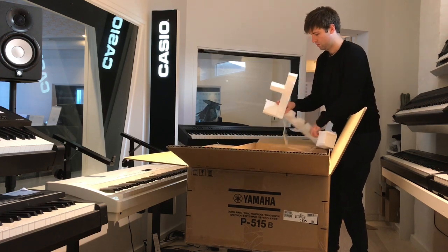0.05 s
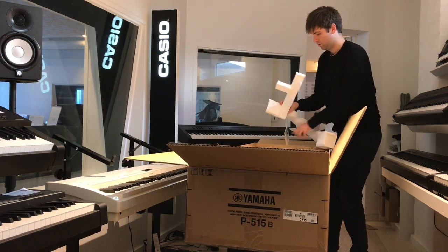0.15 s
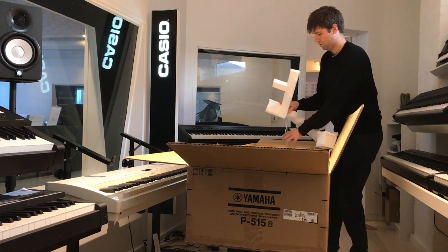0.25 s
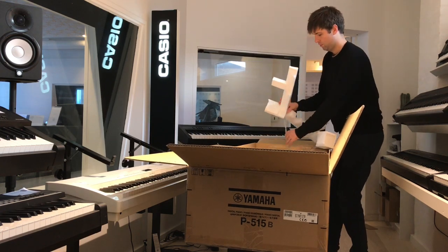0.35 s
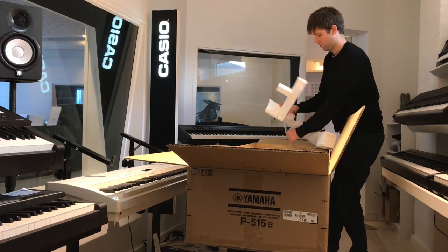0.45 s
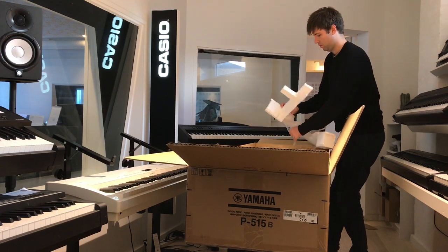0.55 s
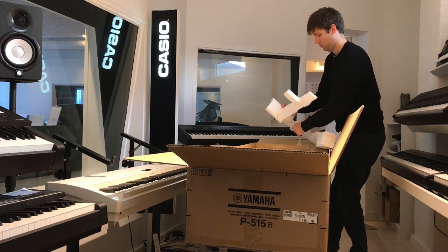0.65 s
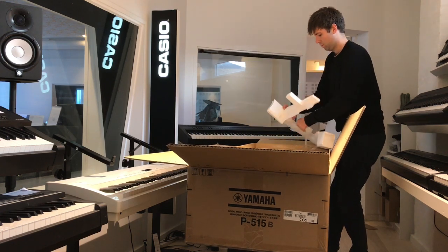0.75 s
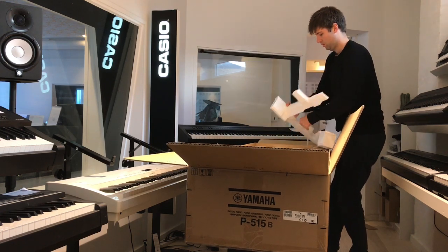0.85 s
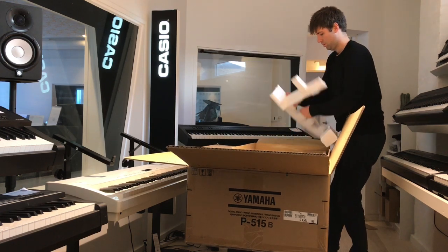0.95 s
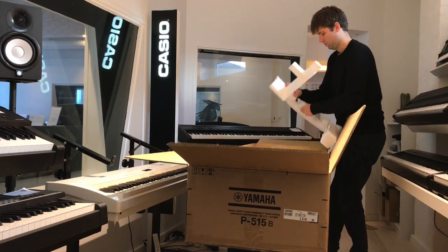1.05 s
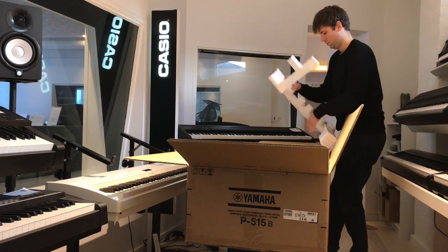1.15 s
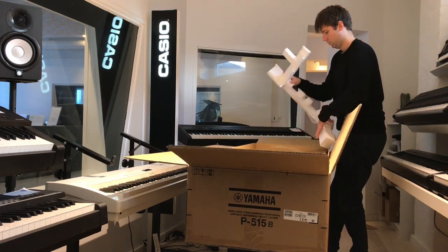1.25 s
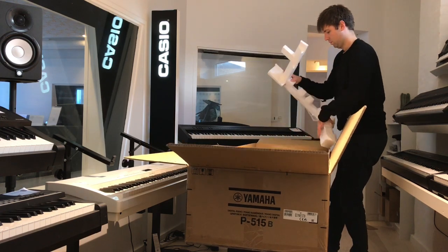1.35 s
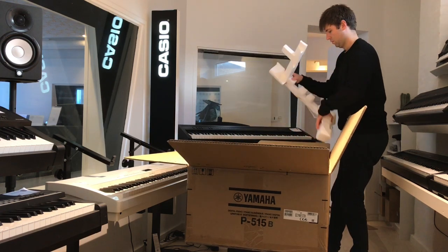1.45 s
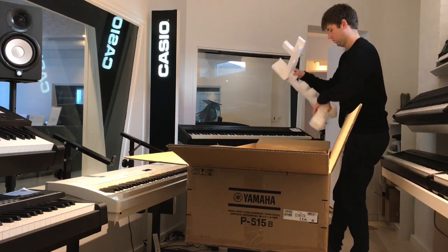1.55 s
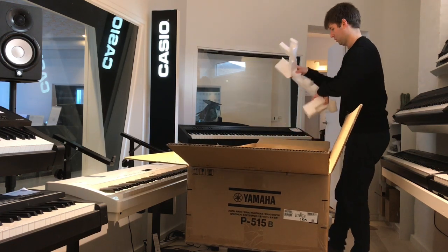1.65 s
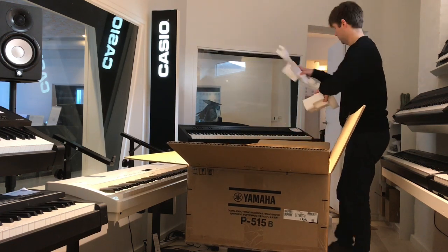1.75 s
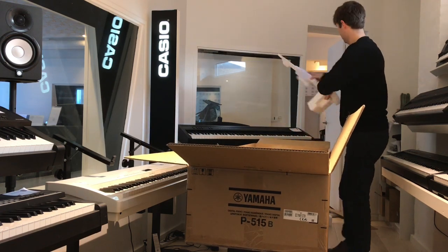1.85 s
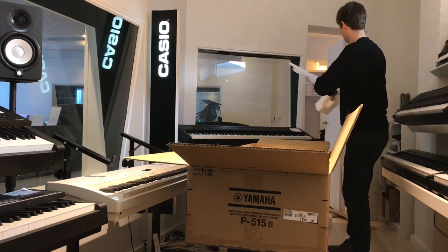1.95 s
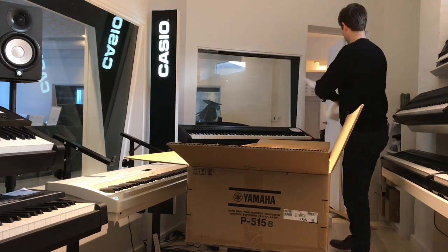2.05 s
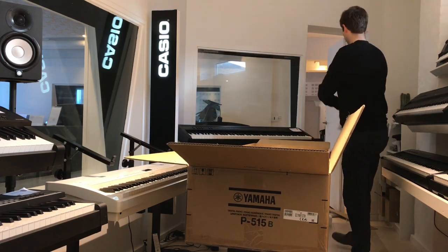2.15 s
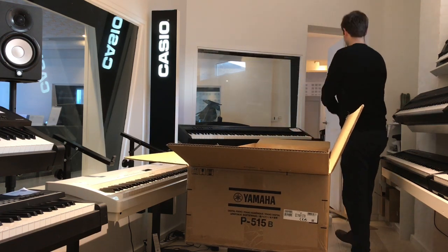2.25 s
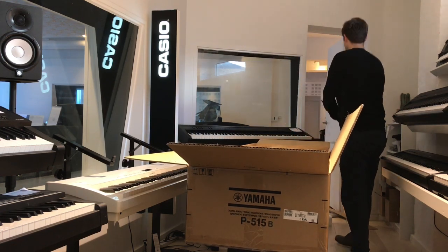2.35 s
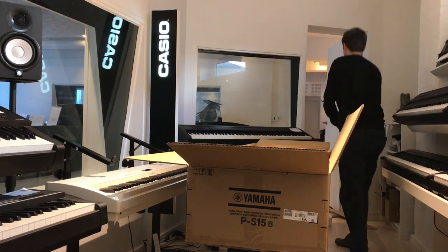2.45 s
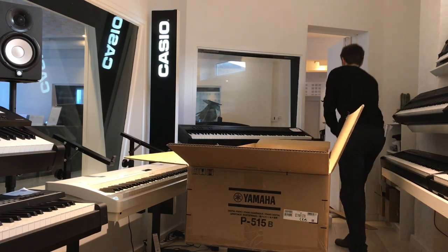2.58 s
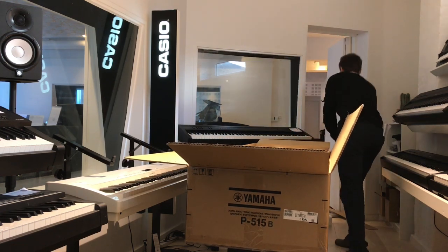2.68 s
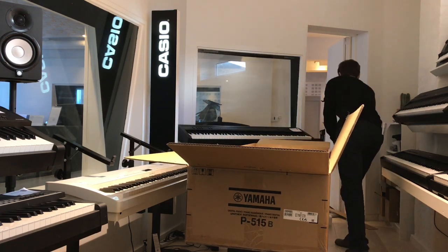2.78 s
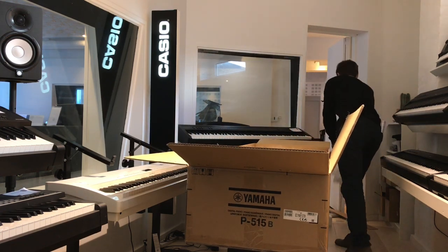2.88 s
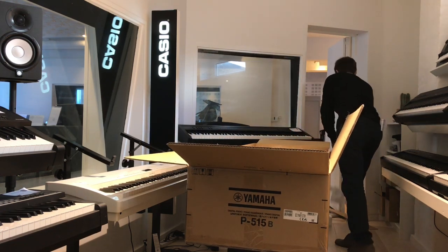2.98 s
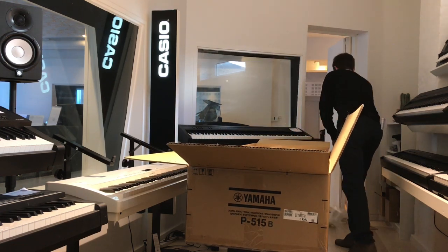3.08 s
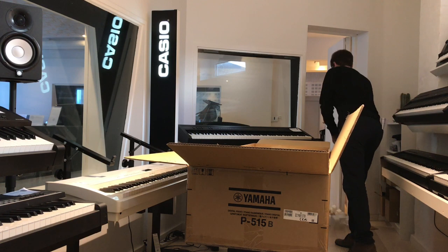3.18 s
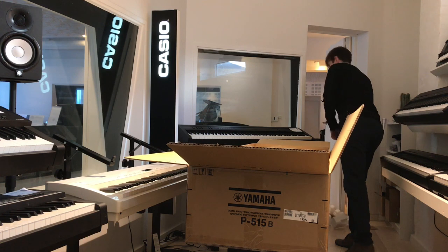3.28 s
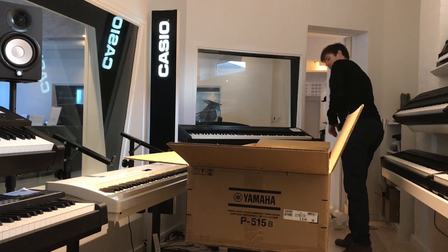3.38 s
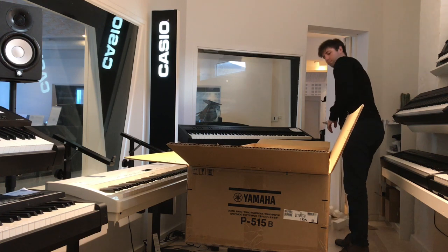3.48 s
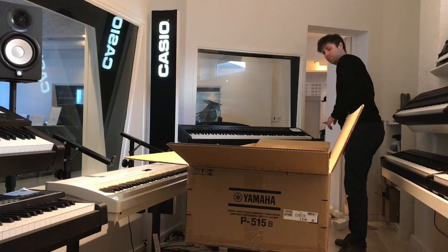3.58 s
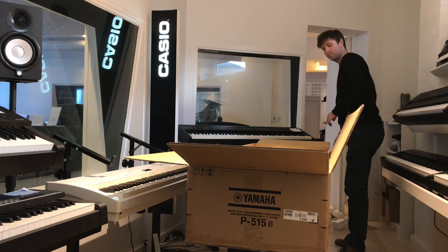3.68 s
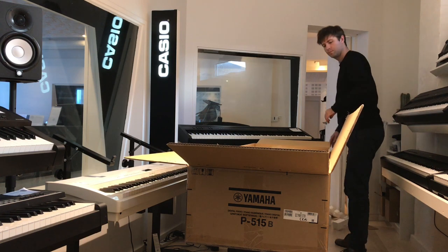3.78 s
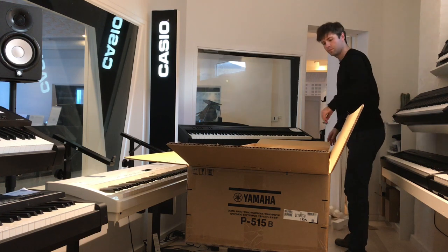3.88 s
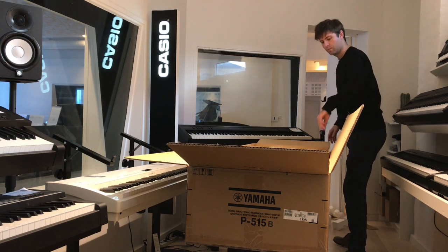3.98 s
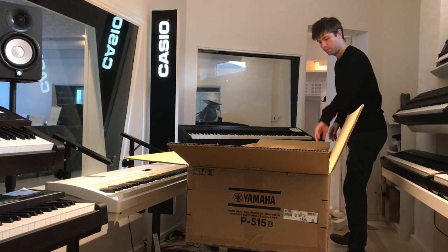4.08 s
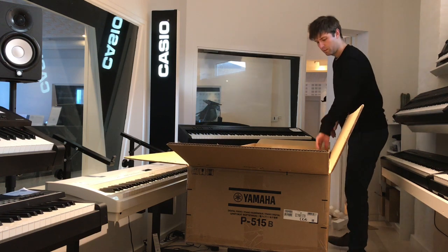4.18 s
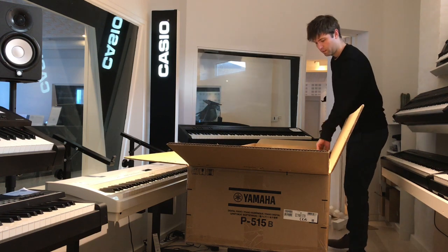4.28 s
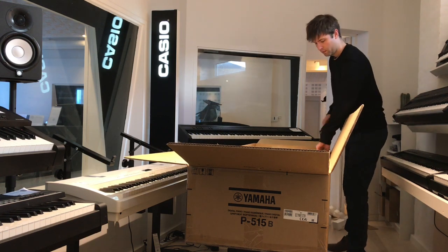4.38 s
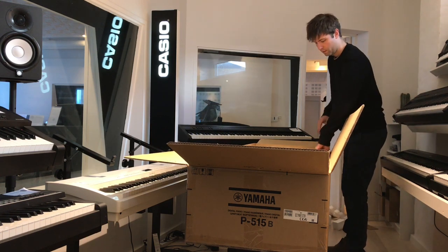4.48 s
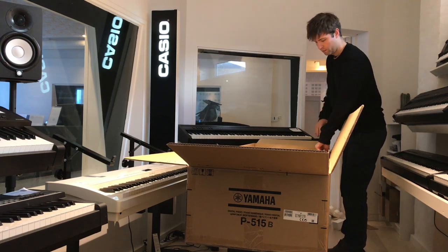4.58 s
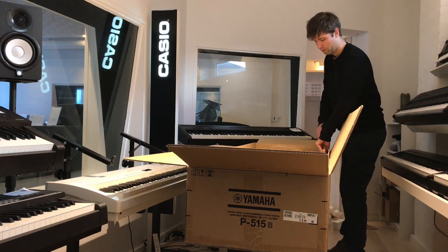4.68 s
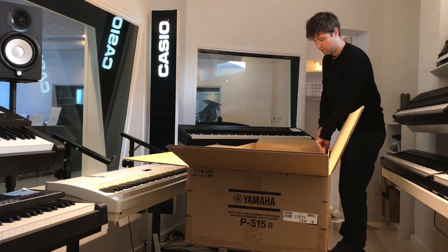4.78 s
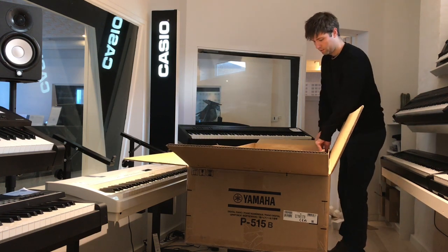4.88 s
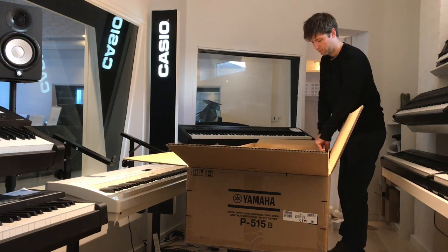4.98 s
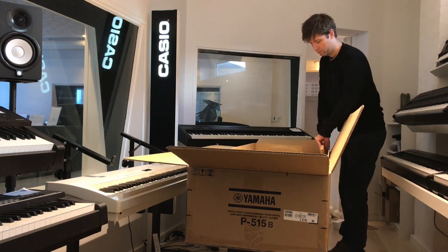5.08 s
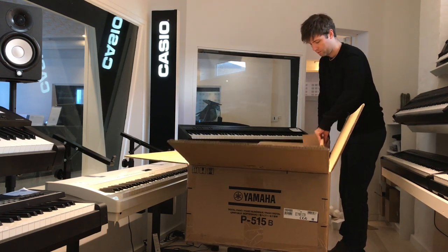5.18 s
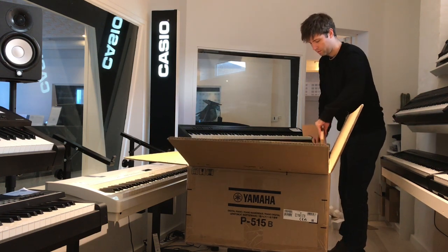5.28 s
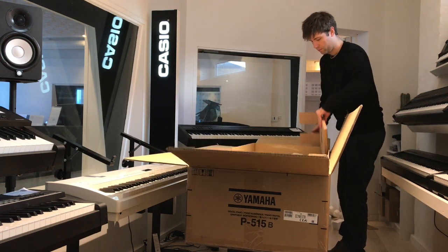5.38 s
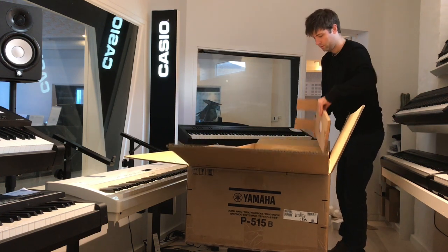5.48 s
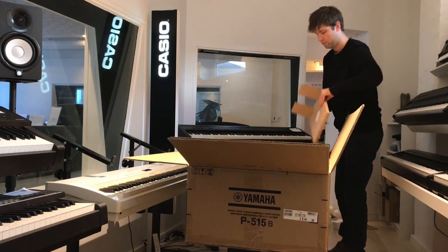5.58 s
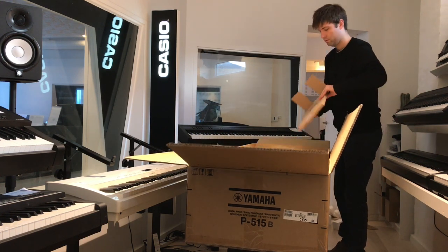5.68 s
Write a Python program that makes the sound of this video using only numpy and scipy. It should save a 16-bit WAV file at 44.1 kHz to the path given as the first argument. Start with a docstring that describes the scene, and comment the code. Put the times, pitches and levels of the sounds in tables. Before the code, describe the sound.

In a small, lightly reverberant room, a polystyrene block is dragged from a big cardboard box in rough, juddering pulls with snaps, short squeaks and hollow booms. It rustles as it is carried off, with a soft step, then lands hard and topples on the floor. After more footfalls, hands slide quietly over cardboard and knock the box. One room microphone, same in both channels.

```python
"""A small live room: a polystyrene block is dragged out of a big cardboard box, carried off rustling
and dropped on the floor, among footfalls; then hands rummage in the box and knock an insert loose.
Scraping is noise made of dense tiny slips; blows add short bursts of slips to ringing panels, block or floor.
Squeals are slips through a narrow resonance. Echoes are noise that follows the energy of the slips.
Quiet room air lies under it all, and one microphone colours the sum, the same in both channels."""
import sys
import numpy as np
from scipy import signal
from scipy.fft import rfft, irfft
from scipy.io import wavfile

SR = 44100
rng = np.random.default_rng(int(sys.argv[2]) if len(sys.argv) > 2 else 0)


def inscribe(sig):
    """Save sig as 16-bit PCM at rate SR to the path in sys.argv[1].

    A 1-D sig is mono; a 2-D sig holds one channel per row.
    Samples are clipped to [-1, 1] before scaling.
    """
    pcm = np.round(np.clip(np.atleast_2d(sig).T, -1, 1) * 32767)
    wavfile.write(sys.argv[1], SR, pcm.astype(np.int16))


N = 253134
TIME = np.arange(N) / SR

# ways the box panels vibrate: [f/Hz, level/dB, time to fade by 60 dB/s]
BOX_MODES = [(69.3, 9, 0.31), (121.9, -4, 1), (135.4, 6, 0.58), (182.9, 1.5, 0.55), (221, -5.5, 0.56),
             (246.2, -3, 0.75), (314, -6.5, 0.19), (364.6, 2.5, 0.38), (500, 0.5, 0.64), (685, 6.5, 0.47),
             (841, 13, 0.23)]
# tone colour of rubbed or crushed foam: [f/Hz, relative level per Hz/dB]
FOAM_SPECTRUM = [(60, -13.5), (300, -19), (600, -4.5), (1000, 0), (3000, 4), (5500, 0.5), (9000, -5),
                 (16000, -10.5)]
# tone colour of rubbed or struck cardboard: [f/Hz, relative level per Hz/dB]
CARD_SPECTRUM = [(40, -0.5), (150, 4.5), (380, 0.5), (520, -2.5), (720, 0), (1050, 1), (1180, 0.5),
                 (1350, 1), (1900, -4.5), (2800, -6), (3400, -10), (4500, -11), (9000, -21), (16000, -30.5)]
# tone colour of bumps, landings and shoe scuffs: [f/Hz, relative level per Hz/dB]
LANDING_SPECTRUM = [(40, -22.5), (150, -1.5), (330, -7.5), (480, -3.5), (950, -2.5), (1400, -8),
                    (2300, -10), (4000, -11), (9000, -19.5), (16000, -23.5)]


def undb(db):
    """Turn decibels into a gain."""
    return 10 ** (np.asarray(db) / 20)


def unit_rms(x):
    """Scale to a mean power of one."""
    return x / np.sqrt(np.mean(x ** 2))


def unit_energy(x):
    """Scale to a total energy of one."""
    return x / np.sqrt(np.sum(x ** 2))


def add(out, s, x):
    """Mix x into out from time s on."""
    i = max(int(s * SR), 0)
    out[i:i + len(x)] += x[:N - i]


def colour(x, spectrum, tilt_db=0, band_hz=(1, SR), size=4096):
    """Filter through spectrum points, with a tilt in dB per octave above 500 Hz; white noise keeps its power."""
    hz, db = np.transpose(spectrum)
    f = np.maximum(np.arange(size // 2 + 1) * SR / size, 1)
    gain_db = np.interp(np.log2(f), np.log2(hz), db)
    gain_db = gain_db + tilt_db * np.maximum(np.log2(f / 500), 0)
    skirts = np.sqrt((1 + (band_hz[0] / f) ** 8) * (1 + (f / band_hz[1]) ** 8))
    # fold the log spectrum's transform forward in time, so the filter never sounds before its input
    cepstrum = irfft(np.log(undb(gain_db) / skirts + 1e-6))
    cepstrum[1:size // 2] *= 2
    cepstrum[size // 2 + 1:] = 0
    response = unit_energy(irfft(np.exp(rfft(cepstrum))))
    return signal.oaconvolve(x, response)[:len(x)]


def below(x, hz):
    """Gently take away what lies above hz."""
    return signal.sosfilt(signal.butter(2, hz, fs=SR, output="sos"), x)


def resonate(x, hz, width_hz):
    """Let one resonance through, with gain one at its centre."""
    return signal.lfilter(*signal.iirpeak(hz, hz / width_hz, fs=SR), x)


def slips(count, per_s, spread_db):
    """Surfaces stick and slip: tiny clicks at random moments, a few much larger than the rest."""
    hit = rng.random(count) < per_s / SR
    size = undb(spread_db * np.minimum(rng.exponential(size=count), 5))
    return unit_rms(hit * size * rng.choice([-1, 1], count))


def walk(per_s):
    """Wander between random values, per_s of them each second, joined by straight lines."""
    knots = rng.standard_normal(N // 20)
    return np.interp(TIME * per_s, np.arange(len(knots)), knots)


def linger(power, t60_s):
    """Spread each bit of energy into an exponential decay."""
    keep = np.exp(-2 * np.log(1000) / (t60_s * SR))
    return signal.lfilter([1 - keep], [1, -keep], power)


def room(x, early_db, tail_db, early_t60_s=0.23, build_t60_s=0.031, treble_hz=5000):
    """Many echo paths add up to noise that follows the energy of the slips; treble dies sooner."""
    low_t60_s, treble_t60_s = 0.56, 0.39
    power = linger(x ** 2, build_t60_s)
    early = slips(len(x), 9000, 2.3) * np.sqrt(linger(power, early_t60_s))
    low = below(rng.standard_normal(len(x)), treble_hz)
    high_pass = signal.butter(2, treble_hz, "high", fs=SR, output="sos")
    high = signal.sosfilt(high_pass, rng.standard_normal(len(x)))
    tail = low * np.sqrt(linger(power, low_t60_s)) + high * np.sqrt(linger(power, treble_t60_s))
    early_gain, tail_gain = undb(early_db), undb(tail_db)
    return (x + early_gain * early + tail_gain * tail) / np.sqrt(1 + early_gain ** 2 + tail_gain ** 2)


def flex(x, ring_db, decay_s=0.0073, shift_hz=1.696):
    """Dense, well damped bending of a sheet or block ripples the spectrum; the ripple shifts steadily."""
    t = TIME[:SR // 20]
    turn = 2 * np.pi * shift_hz * TIME[:len(x)]
    out = x
    for share in (np.cos(turn), np.sin(turn)):
        bending = rng.standard_normal(len(t)) * np.exp(-t / decay_s)
        response = undb(ring_db) * unit_energy(bending)
        out = out + signal.oaconvolve(x * share, response)[:len(x)]
    return out / np.sqrt(1 + undb(ring_db) ** 2)


def effort(strokes, growth=1, fizz_share=0):
    """Each stroke takes hold, swells or slackens steadily, then lets go."""
    grip_s, release_s = 0.0035, 0.024
    power = np.zeros(N)
    for s, length_s, db, swell_db, fizz_db in strokes:
        t = TIME - s
        envelope = np.clip(t / grip_s, 0, 1) * np.exp(-np.clip(t - length_s, 0, 1) / release_s)
        swell = undb(swell_db * (np.clip(t / length_s, 0, 1) - .5))
        gain = undb(db + fizz_share * fizz_db) * (envelope * swell) ** growth
        power += gain ** 2
    return np.sqrt(power)


def friction(strokes, spectrum, rasp_db, per_s, crackle_db, judder_db, waver_db, early_db, tail_db):
    """Dense slips and sparse crackles under a juddering grip, with separate levels for rasp, hiss and fizz."""
    grip = unit_rms(undb(judder_db * walk(110) + waver_db * walk(25.06)))
    crackles = undb(crackle_db) * slips(N, 130, 1.7)
    hiss = effort(strokes)
    # the gain of the top treble bends less with each swell and fade
    fizz = effort(strokes, growth=0.84, fizz_share=1)
    bands = [((1, 2000), undb(rasp_db) * hiss), ((2000, 9000), hiss), ((9000, SR), fizz)]
    out = np.zeros(N)
    for band_hz, gain in bands:
        grains = (slips(N, per_s, 1.65) + crackles) * grip * gain
        out += colour(room(grains, early_db, tail_db), spectrum, band_hz=band_hz)
    return flex(out, ring_db=-8.5)


def panel_weights(panel_hz, octaves=0.39):
    """The panel that is touched favours the box modes near its own pitch."""
    distance = np.log2(np.array(BOX_MODES)[:, 0] / panel_hz) / octaves
    return 1 / (1 + distance ** 2)


def drone(strokes, panel_hz, width_hz, growth):
    """Sliding keeps the box panels humming; the hum grows more slowly than the effort."""
    push = slips(N, 900, 2.8)
    hum = np.zeros(N)
    for weight, (hz, db, _) in zip(panel_weights(panel_hz, octaves=0.86), BOX_MODES):
        hum += weight * undb(db) * resonate(push, hz, width_hz)
    drive = effort(strokes)
    return unit_rms(below(hum, 1440)) * (drive / drive.max()) ** growth


def crunch(length_s, spectrum, tilt_db, early_db, tail_db):
    """A contact crushes beads or fibres: a burst of slips dies away in the room; energy about one."""
    t = TIME[:SR]
    swell_and_fade = np.exp(-t / length_s) * (1 - np.exp(-4 * t / length_s))
    burst = unit_energy(slips(len(t), 9000, 4.2) * swell_and_fade)
    return colour(flex(room(burst, early_db, tail_db), ring_db=-7), spectrum, tilt_db)


def ring(modes, weights, rise_s=0.007, fast_s=0.015, linger_db=-7):
    """Damped modes, a little detuned at each blow: a quick thud, then a weaker ring; energy one."""
    t = TIME[:SR]
    hz, db, t60 = np.transpose(modes)[:, :, None]
    hz = hz * (1 + 0.01995 * rng.standard_normal(hz.shape))
    waves = np.sin(2 * np.pi * (hz * t + rng.random(hz.shape)))
    partials = undb(db) * waves * np.exp(-np.log(1000) * t / t60)
    envelope = (1 - np.exp(-t / rise_s)) * (np.exp(-t / fast_s) + undb(linger_db))
    return unit_energy(np.dot(weights, partials) * envelope)


def box_blows(hits, spectrum, length_s, tilt_db):
    """Each blow crunches at the point of contact and makes the box panels boom."""
    out = np.zeros(N)
    for s, db, boom_db, panel_hz in hits:
        add(out, s, undb(db) * crunch(length_s, spectrum, tilt_db, early_db=3.5, tail_db=6.5))
        add(out, s, undb(boom_db) * ring(BOX_MODES, panel_weights(panel_hz)))
    return out


def scraping():
    """Foam drags along the box wall in pulls, and the rubbing keeps the panels humming."""
    # pulls: [start t/s, length/s, hiss level/dB, swell over the pull/dB, fizz level against the hiss/dB]
    pulls = [(-.02, 0.18, -39, -1.5, 2.5), (.125, 0.081, -38.5, 7.5, -5), (.25, 0.27, -51, 0, -17.5),
             (.44, 0.13, -44, 16.5, -0.5), (.6, 0.18, -41, 7, 2.5), (.775, 0.038, -32, -3, -12),
             (.83, 0.24, -44, -2, -4), (.99, 0.13, -33, -6, -5.5), (1.13, 0.19, -37.5, 8, -6.5),
             (1.285, 0.17, -38.5, -11, -1.5)]
    drag = friction(pulls, FOAM_SPECTRUM, rasp_db=-5.5, per_s=4200, crackle_db=-7.0,
                    judder_db=1.0, waver_db=-0.5, early_db=0.5, tail_db=-1.5)
    return undb(-1.5) * drag + undb(-38.5) * drone(pulls, 166, 17.6, growth=0.78)


def room_air():
    """The quiet air of the room: coloured noise whose level wanders slowly."""
    # tone colour of the air: [f/Hz, relative level per Hz/dB]
    air_spectrum = [(25, -9), (60, -3), (110, -4.5), (250, -7.5), (600, -12.5), (1500, -17), (4000, -21.5),
                    (9000, -31.5), (16000, -27.5)]
    return undb(-63.5 + 0.82 * walk(4.0)) * colour(rng.standard_normal(N), air_spectrum)


def squeaks():
    """Sliding foam squeals: for a moment the slips lock onto one resonance."""
    # squeals: [middle t/s, f/Hz, spread in time/s, level/dB]
    squeals = [(0.084, 9800, .007, -39), (1.135, 1310, 0.014, -40.5), (1.326, 1343, 0.025, -39.5),
               (1.456, 14100, 0.033, -44)]
    out = np.zeros(N)
    for s, hz, length_s, db in squeals:
        width_hz = 0.068 * hz
        once = resonate(slips(N, 2200, 1), hz, width_hz)
        squeal = unit_rms(resonate(once, hz, width_hz))
        out += undb(db) * squeal * np.exp(-.5 * ((TIME - s) / length_s) ** 2)
    return out


def snaps():
    """The foam catches and lets go in short bursts of slips."""
    # snaps: [t/s, energy level/dB, tilt/dB per octave]
    catches = [(.134, 1, 1.5), (.371, -12, -2.5), (.44, -13.5, 4.5), (.789, 1, 3.5), (0.986, 0, 4.5),
               (2.099, -19.5, -1), (2.13, -12.5, 3), (2.389, -21, -1.5), (2.487, -16, 1), (2.609, -13, -1),
               (3.052, -18, 4.5), (3.561, -15.5, -2.5)]
    out = np.zeros(N)
    for s, db, tilt_db in catches:
        add(out, s, undb(db) * crunch(0.0069, FOAM_SPECTRUM, tilt_db, early_db=0, tail_db=5.0))
    return out


def cracks():
    """Single beads and paper fibres crack: mostly very short, bright bursts of slips."""
    # cracks: [t/s, energy level/dB, fading time/s]
    breaks = [(0.2024, -7.5, 0.00035), (0.73, -6.5, 0.00049), (4.631, -24, 0.01), (4.84, -33, .003),
              (5.095, -14.5, 0.00097), (5.15, -27, .004), (5.662, -25, 0.0028)]
    out = np.zeros(N)
    for s, db, length_s in breaks:
        add(out, s, undb(db) * crunch(length_s, FOAM_SPECTRUM, tilt_db=3.5, early_db=1, tail_db=8.0))
    return out


def bumps():
    """The foam bumps the box on its way out: a soft contact and a boom."""
    # bumps: [t/s, crunch energy level/dB, boom energy level/dB, pitch of the struck panel f/Hz]
    hits = [(.56, -8.5, -5, 123), (.662, -7.5, -19, 526), (.676, -26, -5, 150), (.802, -6, -8, 217),
            (.825, -15, -13, 128), (1.007, 0, 5, 347), (1.012, -4, 4.5, 123), (1.022, -28, -7, 68),
            (1.056, 3, 6, 222), (1.291, -7, -24, 235)]
    return box_blows(hits, LANDING_SPECTRUM, length_s=0.01, tilt_db=1.5)


def rustling():
    """The packing shifts in the hands: foam rubs in light strokes."""
    # strokes: [start t/s, length/s, hiss level/dB, swell over the stroke/dB, fizz level against the hiss/dB]
    rustles = [(1.53, 0.43, -44.5, 5.5, -4), (2.0, 0.47, -53, -8, -8.5), (2.49, 0.15, -50.5, 8.5, -25),
               (2.72, 0.069, -47.5, 3, -6), (2.845, 0.093, -46, 1.5, -6.5), (2.97, 0.17, -58, -3.5, -11),
               (3.58, 0.066, -46.5, 0, -8), (3.815, .03, -59, 1, -24)]
    carry = friction(rustles, FOAM_SPECTRUM, rasp_db=-7.5, per_s=4400, crackle_db=-15.5,
                     judder_db=1.75, waver_db=1.3, early_db=-9.0, tail_db=-2.5)
    return undb(-1.0) * carry


def footsteps():
    """Each footfall rings the floor, heel higher than sole, and scuffs its surface."""
    # footfalls: [t/s, heel energy level/dB, delay to the sole/s, sole energy level/dB, scuff energy level/dB]
    steps = [(2.354, -16, 0.025, -10.5, -23.5), (2.496, -35, 0.067, -24, -13),
             (3.867, -12.5, 0.0234, -15, -27), (4.04, -28, 0.031, -24.5, -30.5),
             (4.07, -25, 0.033, -33, -22)]
    # ways the floor vibrates: [multiple of its pitch, level/dB, time to fade by 60 dB/s]
    floor = [(.7, -1, 1), (1, 0.5, 0.52), (1.27, -2, .5), (1.75, -12, 0.3)]
    heel_hz, sole_hz = 155.3, 62.5  # pitch of the floor under each
    out = np.zeros(N)
    for s, heel_db, roll_s, sole_db, scuff_db in steps:
        for delay_s, db, floor_hz in [(0, heel_db, heel_hz), (roll_s, sole_db, sole_hz)]:
            modes = [(floor_hz * ratio, mode_db, t60) for ratio, mode_db, t60 in floor]
            thud = ring(modes, np.ones(len(modes)), rise_s=0.0016, fast_s=0.014, linger_db=-6)
            add(out, s + delay_s, undb(db) * thud)
        scuff = crunch(0.0082, LANDING_SPECTRUM, tilt_db=-3.0, early_db=-18.0, tail_db=9)
        add(out, s, undb(scuff_db) * scuff)
    return out


def drops():
    """The foam block lands, topples and settles: each contact crunches and rings the block."""
    # landings: [t/s, crunch energy level/dB, fading time/s, tilt/dB per octave, ring energy level/dB]
    landings = [(3.1947, 8.5, 0.013, 0, 7.5), (3.227, 8.5, 0.017, -1.5, -1), (3.308, 0.5, 0.0064, -2.5, 1),
                (3.43, -4, .011, -3.5, -7.5)]
    # ways the block vibrates: [f/Hz, level/dB, time to fade by 60 dB/s]
    block = [(70.5, -6, 0.28), (98, -7.5, 0.93), (180, -13, 1), (247.8, -4, 0.62), (308, 4.5, 0.21),
             (339, -2, 0.74), (404, -3.5, 0.42), (546, 0, 0.76), (654, 0.5, 0.49), (750, 1, 0.62),
             (860, -1.5, 0.8), (1000, -4.5, 0.82), (1373, -6.5, 0.77)]
    out = np.zeros(N)
    for s, db, length_s, tilt_db, ring_db in landings:
        add(out, s, undb(db) * crunch(length_s, LANDING_SPECTRUM, tilt_db, early_db=1.0, tail_db=8.5))
        add(out, s, undb(ring_db) * ring(block, np.ones(len(block))))
    return out


def rummaging():
    """Hands and the insert slide over cardboard, and the box panels hum faintly."""
    # strokes: [start t/s, length/s, hiss level/dB, swell over the stroke/dB, fizz level against the hiss/dB]
    slides = [(4.34, 0.16, -62, -1, -2), (4.52, 0.12, -54.5, -3, -10), (4.635, 0.23, -51.5, -3.5, -9),
              (4.92, 0.15, -58.5, -8, -5.5), (5.16, 0.18, -44.5, -1.5, -6), (5.37, 0.11, -54.5, 16.5, 5),
              (5.68, 0.049, -53.5, -9, -12)]
    rub = friction(slides, CARD_SPECTRUM, rasp_db=0.0, per_s=3600, crackle_db=-22,
                   judder_db=2.0, waver_db=1.4, early_db=-5.5, tail_db=-2)
    return undb(-2.5) * rub + undb(-56.5) * drone(slides, 154, 14.0, growth=0.2)


def knocks():
    """Hands and the insert knock on the box: a hard, short contact and a boom."""
    # knocks: [t/s, crunch energy level/dB, boom energy level/dB, pitch of the struck panel f/Hz]
    hits = [(4.347, -35, -45, 330), (4.48, -33, -28, 330), (4.523, -27, -16, 169), (4.635, -10, -36, 230),
            (5.089, -11.5, -22, 260), (5.135, 5.5, -3, 290), (5.156, -4, 2, 196), (5.483, -4, -8.5, 210),
            (5.5, -32, -15, 57.6)]
    return box_blows(hits, CARD_SPECTRUM, length_s=0.0035, tilt_db=1)


def scene():
    """The handling over the quiet air of the room, the same in both channels."""
    foam = scraping() + squeaks() + snaps() + cracks() + rustling() + drops()
    box = bumps() + rummaging() + knocks()
    return np.tile(foam + box + footsteps() + room_air(), (2, 1))


def record(dry):
    """The microphone's place hollows the bass and its port ripples the treble; the top is cut steeply."""
    # tone colour of the microphone: [f/Hz, relative level/dB]
    microphone = [(20, -32), (36, -2.5), (66, 2.5), (92, -6), (125, -1), (4000, -0.5), (4850, -3),
                  (6200, 2.5), (7000, 0.5), (7800, -0.5), (9500, 2), (10500, -3), (12000, 1), (16000, -0.5)]
    heard = np.array([colour(channel, microphone) for channel in dry])
    top_cut = signal.ellip(12, .1, 80, 15850, fs=SR, output="sos")  # low-pass at 15850 Hz
    return signal.sosfilt(top_cut, heard)


dry = scene()
out = record(dry)
inscribe(out)
```